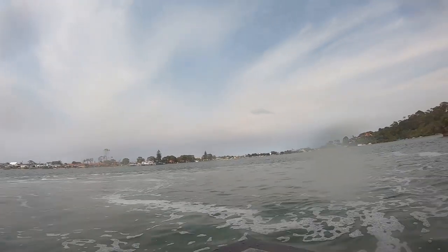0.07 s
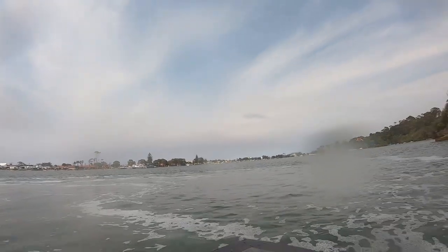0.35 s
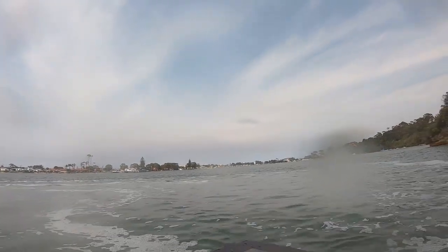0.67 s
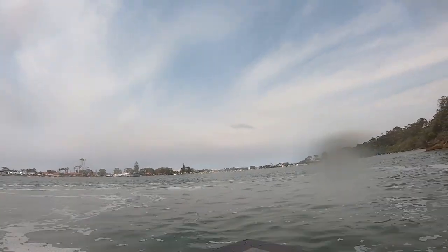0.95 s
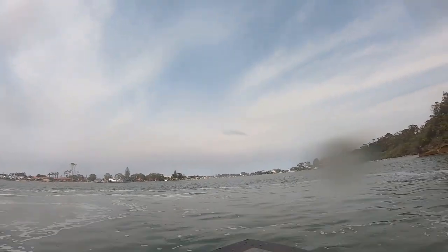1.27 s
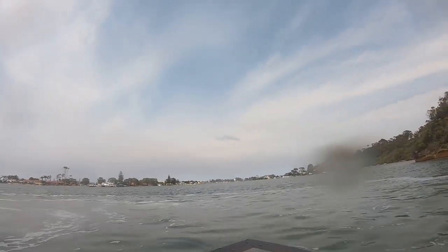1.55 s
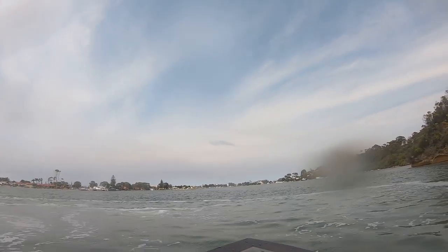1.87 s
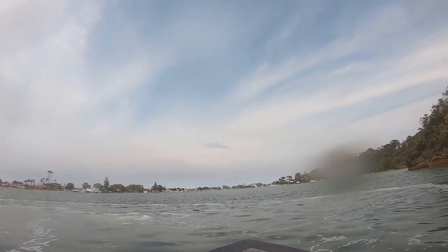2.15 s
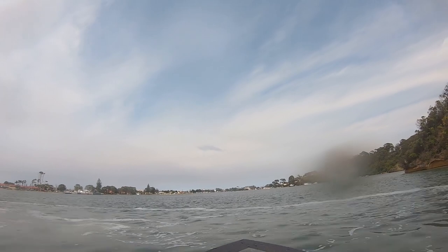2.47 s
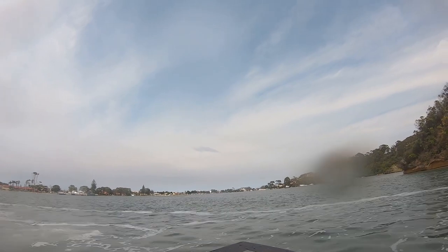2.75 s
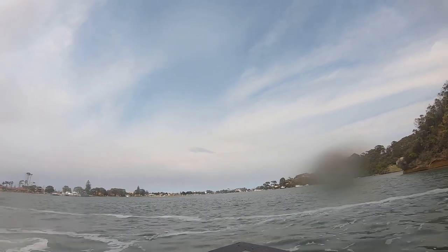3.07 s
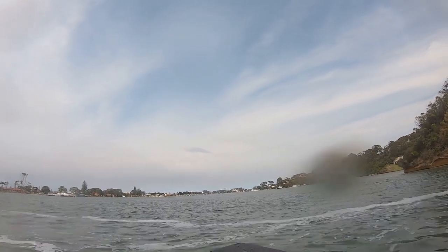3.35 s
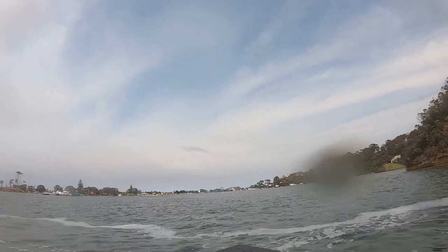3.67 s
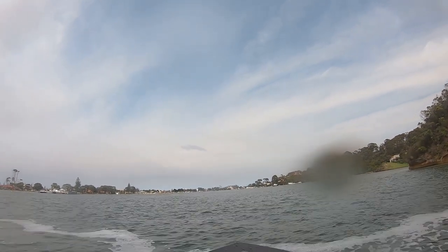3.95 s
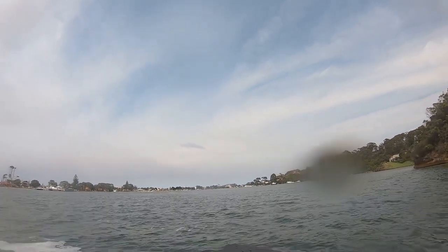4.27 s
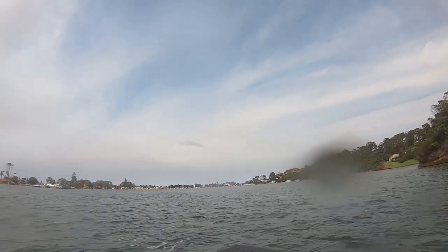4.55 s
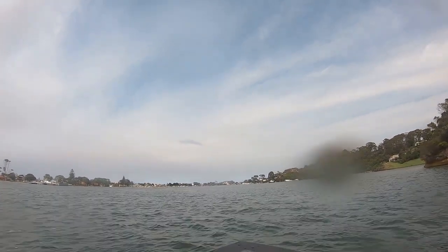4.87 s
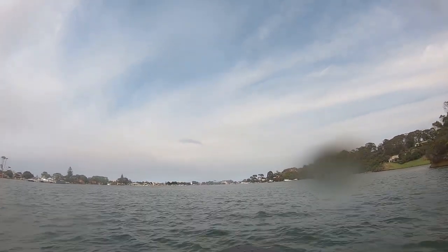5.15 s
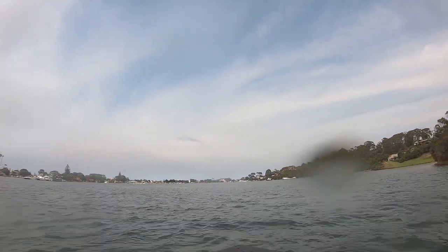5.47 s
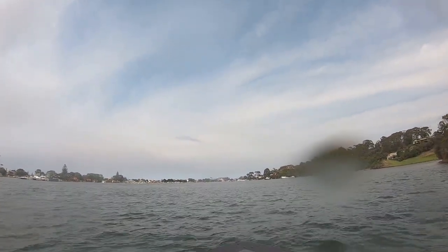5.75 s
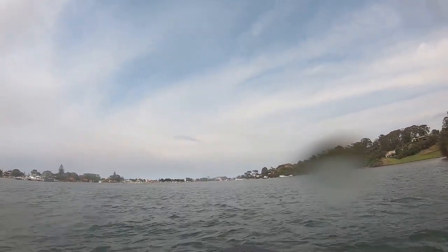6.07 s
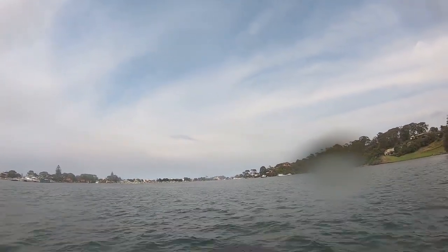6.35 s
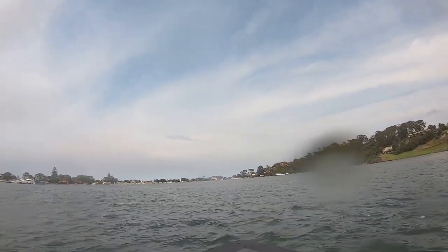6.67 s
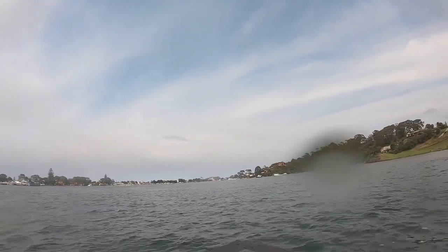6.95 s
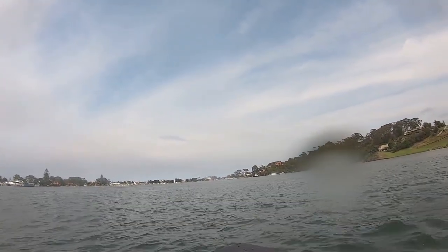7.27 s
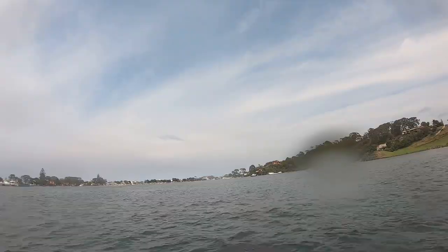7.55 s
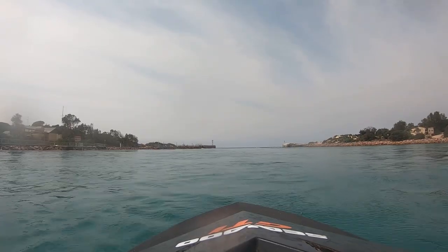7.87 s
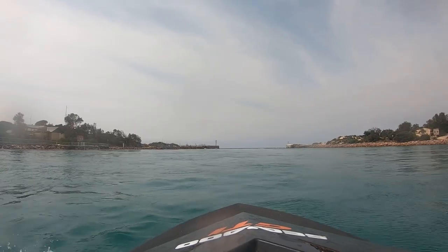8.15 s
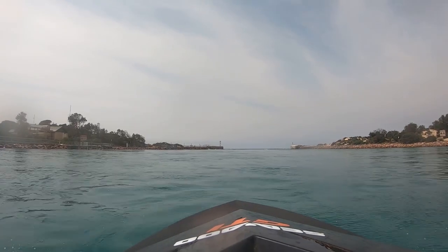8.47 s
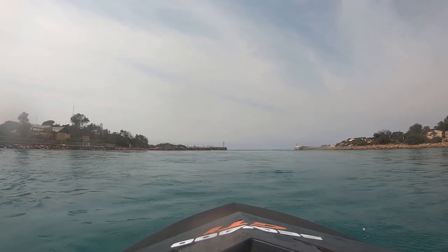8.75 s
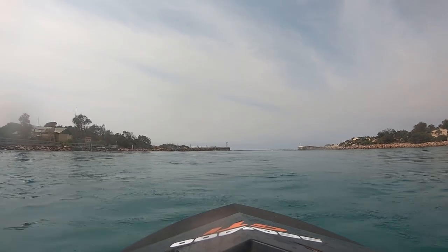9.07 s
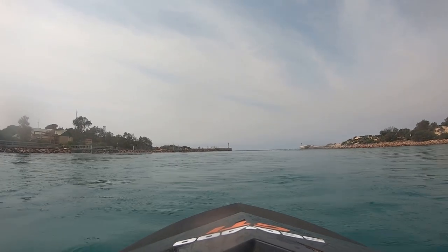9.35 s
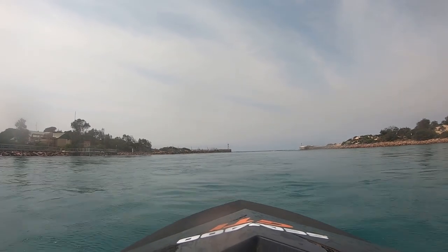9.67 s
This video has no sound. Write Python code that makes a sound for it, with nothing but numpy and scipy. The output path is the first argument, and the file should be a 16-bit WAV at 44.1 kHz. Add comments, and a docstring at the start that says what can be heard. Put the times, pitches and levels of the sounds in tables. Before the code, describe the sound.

A jet ski engine revs up and drones over rushing water and wind, cuts out briefly, then returns slower with splashes.

```python
"""Out on the water, on the deck of a water scooter: its engine revs up, holds, then eases to a cruise.
Three cylinders fire in turn, so the exhaust drones and burbles, wavering as waves pass its outlet.
The jet pump rings, valves tick, the air intake hisses and a loose fitting knocks. Water rushes by,
wind buffets and waves slap the hull. Then the sound stops dead and fades back in on a slower run,
with splashes and bright spray from the bow."""
import sys
import numpy as np
from scipy import signal
from scipy.fft import rfft, irfft, next_fast_len
from scipy.io import wavfile
from scipy.ndimage import uniform_filter1d, minimum_filter1d

SR = 44100
rng = np.random.default_rng(int(sys.argv[2]) if len(sys.argv) > 2 else 0)


def file_out(sig):
    """Save sig as 16-bit WAV at sys.argv[1]."""
    # one column per channel
    cols = np.atleast_2d(sig).T
    # limit, then scale
    lim = np.clip(cols, -1, 1)
    pcm = np.round(lim * 32767).astype(np.int16)
    wavfile.write(sys.argv[1], SR, pcm)


N = 432180

# "Revs" are engine cycles per second. An "order" is a tone at a whole multiple of the revs.
# Engine speed on the fast run and on the slow run. Each row: time in seconds, revs.
FAST_REVS = [(0.08, 26.0), (0.27, 27.4), (0.69, 31.1), (1.02, 35.8), (1.25, 37.9), (2.05, 42.3),
             (3.02, 43.2), (3.5, 42.7), (3.8, 42.8), (3.99, 41.9), (4.28, 37.5), (4.8, 39.5), (4.97, 39.5),
             (5.18, 38.5), (5.43, 39.4), (5.81, 39.0), (5.92, 38.6), (6.23, 39.2), (6.44, 38.7),
             (6.78, 39.6), (7.05, 38.4), (7.37, 38.9), (7.51, 38.0), (7.62, 38.0)]
SLOW_REVS = [(7.92, 34.2), (8.28, 35.3), (8.564, 35.1), (9.05, 35.3)]
# The two main exhaust tones. Each row: revs, base level of the firing tone in dB, of its octave in dB.
MAIN_TONE_LEVELS = [(26.4, -35.5, -23), (29.3, -25, -18), (33.1, -25, -42.5), (35.8, -17, -29),
                    (37.03, -15, -26.5), (39.2, -17, -22), (41.34, -20, -12.5), (42.3, -16.5, -15)]
# Waves change how deep the exhaust outlet lies.
# Each row: time in seconds, change of the firing tone in dB, change of its octave in dB.
OUTLET_WAVES = [(2.301, -2.5, -8), (4.251, -0.5, 6.5), (4.68, 2.5, -9), (5.351, -5, 1.5), (5.74, 0.5, -3),
                (6.1, -5, 3.5), (6.3, -4.5, -4.5), (6.72, 1, -3.5), (7.08, -4, 7), (7.35, -4, -10),
                (7.55, -2.5, 4)]
# The other exhaust tones on the fast run. Each row: order, base levels in dB at low, middle, cruising
# and full revs, then dB added when the engine pulls hardest.
FAST_ORDER_LEVELS = [(2, -28, -28, -28, -26.5, 6), (4, -37.5, -29, -34.5, -27.5, 4),
                     (5, -41, -37.5, -40.5, -38, -1), (7, -39, -39.5, -43, -33.5, 4.5),
                     (8, -28.5, -27.5, -34.5, -26, 1), (9, -18, -25, -34.5, -36, -4.5),
                     (10, -33, -37, -37, -36.5, -2), (11, -42.5, -34.5, -45, -40, -4.5),
                     (12, -35, -36, -46.5, -45.5, -6.5)]
# Single orders swell or dip. Each row: time in seconds, order, change in dB.
ORDER_CHANGES = [(0.501, 10, 8.5), (0.48, 8, -11.5), (0.62, 7, 9.5), (1.68, 8, -15.5), (1.75, 4, 5.5),
                 (2.0, 7, 3), (2.4, 4, -8.5), (2.56, 7, -10.5), (3.05, 2, -6), (3.05, 4, -6),
                 (3.1, 8, -9.5), (3.5, 4, 5), (3.851, 8, 3.5)]
# Pitches at which the exhaust pipe rings. Each row: pitch in Hz, half width in Hz, boost in dB.
PIPE_RESONANCES = [(161, 3.6, 9), (294.2, 9, 7), (387.7, 6.3, 5.5)]
# The other exhaust tones on the slow run. Each row: order, base level in dB.
SLOW_ORDER_LEVELS = [(2, -33), (4, -32), (5, -34.5), (7, -36), (8, -33), (9, -30.5), (12, -35.5)]
# Orders that sing at top speed. Each row: order, base level in dB compared with the rasp.
SINGING_ORDERS = [(12, 3), (13, 1), (16, -4), (17, -1), (20, -2), (28, -2.5)]
# How hard the jet pump works, given as the strength of its ring. Each row: time in seconds, dB.
PUMP_LOAD = [(0.15, -44), (0.88, -44.5), (1.44, -33.5), (1.78, -33.5), (1.93, -44), (3.24, -36.5),
             (4.0, -36.5), (4.4, -41), (4.92, -36.5), (5.12, -43), (5.29, -36), (5.58, -38), (6.9, -33.5),
             (7.08, -38), (7.56, -34.5)]
# Pitches at which the pump housing rings. Each row: pitch in Hz, width in Hz, relative level in dB.
PUMP_RESONANCES = [(1208, 68, -1), (1320.6, 100, -1), (1220, 470, -14.5)]
# Valve ticks of the three cylinders. Each row: place in the cycle from 0 to 1, then relative levels
# in dB at cruise, at full revs and while rattling.
VALVE_TICKS = [(.85, 0, 0, -6), (.16, -9, -4, 0), (.5, -6, -9, -4)]
# The exhaust's burble on the fast run. Each row: time in seconds, level in dB.
BURBLE_LEVELS = [(0, -23), (.85, -25), (1.5, -29), (3.4, -26.5), (6.5, -26), (7.6, -24.5)]
# Knocks, slaps and splashes. Each row: start in seconds, relative strength in dB.
FITTING_KNOCKS = [(1.2237, -28), (1.4095, -33), (1.7195, -32), (1.8685, -32), (4.0028, -37),
                  (4.0766, -32.5)]
HULL_SLAPS = [(4.066, -17.5), (4.881, -15.5), (4.93, -19), (6.835, -17), (7.345, -18), (7.446, -17.5),
              (8.322, -17), (9.19, -15), (9.248, -17)]
BOW_SPLASHES = [(8.279, -17.5), (8.32, -16), (8.383, -18), (8.422, -19.5), (8.453, -24), (8.835, -18.5),
                (9.008, -23.5), (9.33, -22.5)]
# The tone colour of each noise. Each row: frequency in Hz, relative level there in dB.
WATER_SPECTRUM = [(200, 3), (450, 7.5), (850, -4), (1100, -1), (1600, -6), (2300, -18), (5200, -40.5),
                  (6400, -54)]
RASP_SPECTRUM = [(900, -14), (1700, 5.5), (2900, 2.5), (3550, 6), (3900, -8.5), (4700, -20), (6000, -34.5)]
WIND_SPECTRUM = [(15, -12.5), (30, -5), (55, 1), (90, -0.5), (125, -2.5), (170, -14), (400, -29.5)]
TICK_SPECTRUM = [(2500, 2.5), (4250, 6.5), (4650, -6), (4950, -3.5), (5400, -12.5), (5700, -4.5),
                 (6100, -17.5), (6450, -12), (7250, -14), (8200, -30), (9000, -21.5), (11000, -51.5)]
INTAKE_SPECTRUM = [(3200, -21.5), (3750, 2.5), (4100, 0.5), (4450, -11.5), (4900, -27.5)]
BURBLE_SPECTRUM = [(60, -20.5), (150, -4), (220, 2.5), (300, 0), (400, -12.5), (550, -29)]
SLAP_SPECTRUM = [(300, -2.5), (600, 6), (800, -6), (1400, -17.5), (3000, -39)]
WASH_SPECTRUM = [(150, 15), (280, 13.5), (420, 9.5), (600, 2.5), (850, -3), (1400, -5.5), (3200, -17.5),
                 (6000, -39.5)]
SPRAY_SPECTRUM = [(1500, 5), (3200, 2), (4000, 2), (5000, 0.5), (6000, -9.5), (7500, -6.5), (8700, -10.5),
                  (10500, -25), (14000, -40)]
SPLASH_SPECTRUM = [(550, 7), (1250, -1), (1900, -8.5), (4000, -33)]

LOW_REVS, MIDDLE_REVS, CRUISE_REVS, FULL_REVS = 29.7, 32, 39.88, 41.33
CUT_S, RETURN_S, FADE_S = 7.658, 7.825, 0.078  # fast run ends, slow run starts, length of its fade-in
TIME = np.arange(N) / SR
SLOW_RUN_TIME = np.maximum(TIME - RETURN_S, 0)


def from_db(db):
    """Turn decibels into a number to multiply by."""
    return 10 ** (np.asarray(db) / 20)


def rms_one(x):
    """Scale a signal so that its average strength (rms) is 1."""
    return x / np.sqrt(np.mean(x ** 2) + 1e-20)


def curve(rows):
    """Join rows of time and value with straight lines, giving a value for every sample."""
    return np.interp(TIME, *np.transpose(rows))


def drift(rate_hz):
    """A smooth random wobble, about 1 in size."""
    step, warm_up = 40, 2000  # worked out only every 40th sample
    keep = np.exp(-2 * np.pi * step * rate_hz / SR)
    noise = rng.standard_normal(N // step + warm_up + 2)
    smooth = signal.lfilter([1], [1, -2 * keep, keep * keep], noise)[warm_up:]
    return np.interp(np.arange(N) / step, np.arange(len(smooth)), rms_one(smooth))


def swell(peak_s, rise_s, fall_s):
    """A smooth hump that reaches 1 at the given time."""
    age = TIME - peak_s
    return np.exp(-(age / np.where(age < 0, rise_s, fall_s)) ** 2)


def bursts(events, rise_s, decay_s):
    """The strength over time of blows that build quickly and die away."""
    strength = np.zeros(N)
    for start_s, db in events:
        age = np.maximum(TIME - start_s, 0)
        strength += from_db(db) * (1 - np.exp(-age / rise_s)) * np.exp(-age / decay_s)
    return strength


def coloured(x, spectrum):
    """Give a signal a tone colour from a table, at strength 1."""
    size = next_fast_len(N + SR // 10)
    hz, db = np.transpose(spectrum)
    bins = np.maximum(np.fft.rfftfreq(size, 1 / SR), 1)
    gain = from_db(np.interp(np.log(bins), np.log(hz), db))
    edge_fade = np.minimum(bins / hz[0], 1) * np.minimum(hz[-1] / bins, 1) ** 3
    return rms_one(irfft(rfft(x, size) * edge_fade * gain, size)[:N])


def resonate(x, hz, width_hz):
    """Let through only a band around one pitch, so that the signal rings."""
    r = np.exp(-np.pi * width_hz / SR)
    feedback = [1, -2 * r * np.cos(2 * np.pi * hz / SR), r * r]
    return signal.lfilter(np.array([1, 0, -1]) * (1 - r * r) / 2, feedback, x)


def puffs(beats, decay):
    """Noise that jumps up on each whole beat, then fades; the decay is counted in beats."""
    return rms_one(rng.standard_normal(N) * np.exp(-(beats % 1) / decay))


def drops(per_s, spread_db):
    """Tiny clicks of uneven size at random times, like drops of water."""
    sizes = from_db(spread_db * np.minimum(rng.exponential(1, N), 4))
    return rms_one(sizes * rng.standard_normal(N) * (rng.random(N) < per_s / SR))


def evened(x, span_s):
    """Hold a noise at a steady strength by flattening swells longer than the span."""
    power = np.abs(uniform_filter1d(x * x, int(span_s * SR) + 1))
    return x / np.sqrt(power + 1e-6)


def steady_noise(spectrum, span_s):
    """Noise with a tone colour and an even strength."""
    return evened(coloured(rng.standard_normal(N), spectrum), span_s)


def hull_speed(revs, lag_s=0.7):
    """The hull takes time to catch up with the engine; its speed is given as the matching revs."""
    keep = np.exp(-1 / (lag_s * SR))
    return revs[0] + signal.lfilter([1 - keep], [1, -keep], revs - revs[0])


def pulling(revs, full_lead_revs=3.2):
    """How hard the engine pulls, from 0 to 1: how far it runs ahead of the hull."""
    return np.clip((revs - hull_speed(revs)) / full_lead_revs, 0, 1)


def order_tone(cycles, order, rough):
    """One engine tone; uneven burning of the fuel shakes its level and timing."""
    phase = 2 * np.pi * (order * cycles + rng.random())
    return np.sqrt(2) * ((1 + rough * drift(7.3)) * np.cos(phase) + rough * drift(8.3) * np.sin(phase))


def main_tone_levels(revs, slow):
    """Levels in dB of the firing tone and its octave; on the fast run, revs and waves move them."""
    table_revs, firing_levels, octave_levels = np.transpose(MAIN_TONE_LEVELS)
    firing_db = np.interp(revs, table_revs, firing_levels) + 1.7 * pulling(revs)
    octave_db = np.interp(revs, table_revs, octave_levels)
    for time_s, firing_change_db, octave_change_db in OUTLET_WAVES:
        wave = swell(time_s, rise_s=0.13, fall_s=0.13)
        firing_db += firing_change_db * wave
        octave_db += octave_change_db * wave
    return np.where(slow, -21, firing_db), np.where(slow, -22.5 - 6 * SLOW_RUN_TIME, octave_db)


def exhaust(cycles, revs, slow):
    """Three firings a cycle make the main tone; unequal cylinders add the other orders."""
    firing_db, octave_db = main_tone_levels(revs, slow)
    pull = pulling(revs)
    rough = np.interp(revs, [CRUISE_REVS, FULL_REVS], [0.14, 0.07])
    rough *= 1 - 0.5 * pull  # pulling steadies the tones
    drone = from_db(firing_db) * order_tone(cycles, 3, rough)
    drone += from_db(octave_db) * order_tone(cycles, 6, rough)
    for order, *levels_db, pull_db in FAST_ORDER_LEVELS:
        level_db = np.interp(revs, [LOW_REVS, MIDDLE_REVS, CRUISE_REVS, FULL_REVS], levels_db)
        level_db += pull_db * pull
        for time_s, changed_order, change_db in ORDER_CHANGES:
            if changed_order == order:
                level_db += change_db * swell(time_s, rise_s=0.18, fall_s=0.18)
        for hz, half_width, boost_db in PIPE_RESONANCES:  # louder near a pitch where the pipe rings
            level_db += boost_db / (1 + ((order * revs - hz) / half_width) ** 2)
        drone += ~slow * from_db(level_db) * order_tone(cycles, order, 2 * rough)
    follow_db = 0.85 * (octave_db + 28)  # the slow run's orders fade along with the octave
    for order, level_db in SLOW_ORDER_LEVELS:
        drone += slow * from_db(level_db + follow_db) * order_tone(cycles, order, rough=0.1)
    return drone * (1 + 0.06 * drift(30))  # the firings vary in force


def water_rush(revs, load_db):
    """Water rushes past, louder as the hull speeds up and the pump works harder."""
    level_db = -32.5 + 0.22 * (hull_speed(revs) - CRUISE_REVS) + 0.1 * load_db + 0.33 * drift(3.6)
    return from_db(level_db) * coloured(drops(per_s=7000, spread_db=2), WATER_SPECTRUM)


def engine_rasp(cycles, revs, load_db, singing_revs=42.5):
    """Each firing rasps; high orders buzz as the engine pulls, and a few sing out at top speed."""
    rasp = coloured(puffs(3 * cycles, decay=1.7), RASP_SPECTRUM)
    buzz = sum(order_tone(cycles, order, rough=0.35) / np.sqrt(order) for order in range(13, 37))
    singing = sum(from_db(db) * order_tone(cycles, order, rough=0.3) for order, db in SINGING_ORDERS)
    buzz_db = 2 + 3.5 * pulling(revs)
    singing_db = 3 * (np.minimum(revs, hull_speed(revs)) - singing_revs)
    level_db = -45 + 0.38 * (revs - CRUISE_REVS) + 0.44 * load_db
    return from_db(level_db) * (rasp + from_db(buzz_db) * buzz + from_db(singing_db) * singing)


def wind(start_db=-30.5, rise_db_per_s=1.74, gust_db=7):
    """Wind rumbles louder and louder through the fast run, with one early gust."""
    level_db = start_db + rise_db_per_s * TIME + gust_db * swell(0.7, rise_s=0.41, fall_s=0.19)
    return from_db(level_db) * steady_noise(WIND_SPECTRUM, span_s=0.11)


def jet_pump(cycles, revs, pump_db):
    """Churning water rings the pump housing; while the engine pulls, the shaft adds a clatter."""
    clatter_gain = 0.8 * pulling(revs)
    ring = np.zeros(N)
    for hz, width_hz, db in PUMP_RESONANCES:
        clatter = rms_one(puffs(cycles, decay=0.2) + 0.6 * puffs(3 * cycles, decay=0.2))
        churn = (rng.standard_normal(N) + clatter_gain * clatter) / np.hypot(1, clatter_gain)
        surge_db = 1.3 * drift(6)
        ring += from_db(db + surge_db) * resonate(resonate(churn, hz, width_hz), hz, width_hz)
    return from_db(pump_db + 0.5) * rms_one(ring)


def valve_ticks(cycles, revs, load_db, eased_db, rattle_from_s=1.17, rattle_to_s=1.88, decay_s=0.0018):
    """Each cylinder's valves tick once a cycle over the sizzle of the chain that drives them."""
    rattling = (TIME > rattle_from_s) & (TIME < rattle_to_s)  # full throttle hardens the ticks
    ticks = from_db(np.where(rattling, -6, -17)) * rng.standard_normal(N)  # start with the chain
    for place, cruise_db, full_db, rattle_db in VALVE_TICKS:
        running_db = np.interp(revs, [CRUISE_REVS, FULL_REVS], [cruise_db, full_db])
        valve_db = np.where(rattling, rattle_db, running_db)
        age = ((cycles - place) % 1) / revs
        tick = evened(rng.standard_normal(N), span_s=0.001) * np.exp(-age / decay_s)
        ticks += from_db(valve_db + 1.7 * drift(27)) * rms_one(tick)
    level_db = -56 + 0.18 * (revs - CRUISE_REVS) + 0.93 * load_db + eased_db
    level_db -= 2.5 * (TIME <= rattle_from_s)  # softer before the throttle opens
    return from_db(np.where(rattling, -52, level_db)) * coloured(ticks, TICK_SPECTRUM)


def air_intake(cycles, revs, eased_db):
    """The intake gulps air once a cycle, with a hiss that grows as the revs rise."""
    first_valve_place = VALVE_TICKS[0][0]
    hiss = coloured(puffs(cycles - first_valve_place, decay=0.58), INTAKE_SPECTRUM)
    return from_db(-56.5 + 2.5 * (revs - FULL_REVS) + eased_db) * hiss


def burble(cycles):
    """Each firing puffs gas through the wet exhaust."""
    gas = coloured(puffs(3 * cycles, decay=0.42), BURBLE_SPECTRUM)
    return from_db(curve(BURBLE_LEVELS)) * evened(gas, span_s=0.048)


def fast_run(cycles, revs, ease_times_s=(2.05, 4.25)):
    """Water, wind and machinery at speed; ticks and intake dip at two moments of easing off."""
    pump_db = curve(PUMP_LOAD)
    load_db = pump_db - pump_db.mean()  # how far the pump's load is above its average
    eased_db = -7.5 * sum(swell(time_s, rise_s=0.15, fall_s=0.15) for time_s in ease_times_s)
    sound = water_rush(revs, load_db) + engine_rasp(cycles, revs, load_db) + wind()
    sound += jet_pump(cycles, revs, pump_db) + valve_ticks(cycles, revs, load_db, eased_db)
    return sound + air_intake(cycles, revs, eased_db) + burble(cycles)


def loose_fitting():
    """A loose fitting gives a few hard, bright knocks."""
    strength = bursts(FITTING_KNOCKS, rise_s=0.0003, decay_s=0.0021)
    return strength * coloured(rng.standard_normal(N), TICK_SPECTRUM)


def hull_slaps():
    """Waves meet the hull with a hollow knock."""
    strength = from_db(-3.5) * bursts(HULL_SLAPS, rise_s=0.0026, decay_s=0.015)
    return strength * steady_noise(SLAP_SPECTRUM, span_s=0.0063)


def slow_run(settle_db_per_s=1.83):
    """In steady wind, wash and fine spray swell as the bow ploughs into a wave, then settle."""
    plunge = swell(8.5, rise_s=0.24, fall_s=0.076)
    settled_db = settle_db_per_s * SLOW_RUN_TIME
    wash_db = -21.5 + 2 * plunge - settled_db + 1.4 * drift(22)  # the wash comes in clumps
    spray_db = -44.5 + 6.5 * plunge - settled_db
    wash = from_db(wash_db) * coloured(drops(per_s=6000, spread_db=1), WASH_SPECTRUM)
    spray = from_db(spray_db) * coloured(drops(per_s=20000, spread_db=0), SPRAY_SPECTRUM)
    steady_wind = from_db(-19) * steady_noise(WIND_SPECTRUM, span_s=0.084)
    return wash + spray + steady_wind


def bow_splashes():
    """Water thrown up by the bow falls back as a dense shower of drops."""
    shower = coloured(drops(per_s=6000, spread_db=-1), SPLASH_SPECTRUM)
    return bursts(BOW_SPLASHES, rise_s=0.0036, decay_s=0.016) * evened(shower, span_s=0.0039)


def scene():
    """One engine drones through both runs, with slaps, splashes and knocks on top."""
    slow = TIME > (CUT_S + RETURN_S) / 2
    revs = curve(np.vstack([FAST_REVS, SLOW_REVS]))
    cycles = np.cumsum(revs) / SR + 0.0018 * drift(30)  # firings come slightly early or late
    drone = exhaust(cycles, revs, slow)
    ride = np.where(slow, slow_run(), fast_run(cycles, revs))
    return (drone + ride + hull_slaps() + bow_splashes() + loose_fitting())[None]


def record(dry, peak_limit=0.66, cutoff_hz=15000):
    """Hold down the peaks, leave a short silence between the runs and remove the highest treble."""
    span = int(0.062 * SR)
    allowed_gain = np.minimum(1, peak_limit / (np.abs(dry) + 1e-9))
    limited = dry * uniform_filter1d(minimum_filter1d(allowed_gain, span), span)
    fast_gain = np.minimum(TIME / 0.0023, 1) * (TIME < CUT_S)
    slow_gain = np.clip(SLOW_RUN_TIME / FADE_S, 0, 1) ** 2
    low_pass = signal.cheby2(12, 70, cutoff_hz, fs=SR, output="sos")
    return signal.sosfilt(low_pass, limited * (fast_gain + slow_gain))


dry = scene()
out = record(dry)
file_out(out)
```